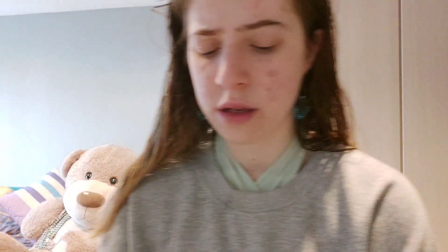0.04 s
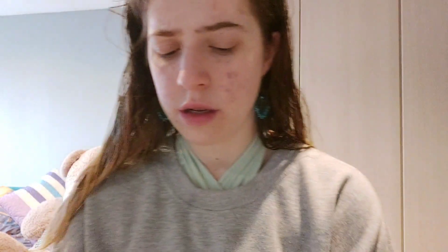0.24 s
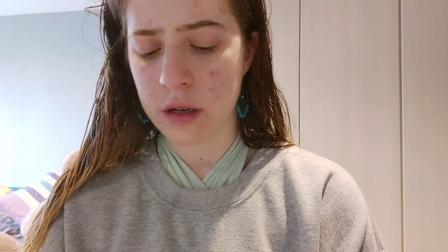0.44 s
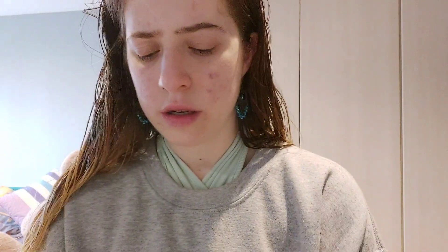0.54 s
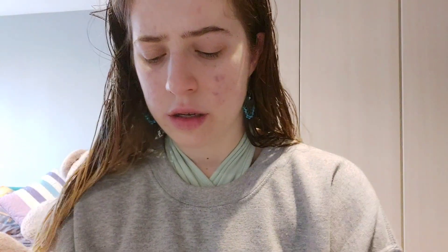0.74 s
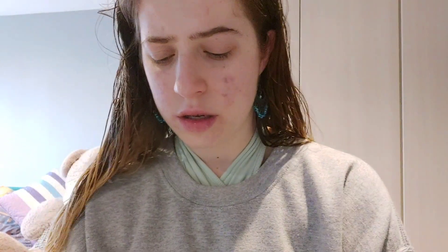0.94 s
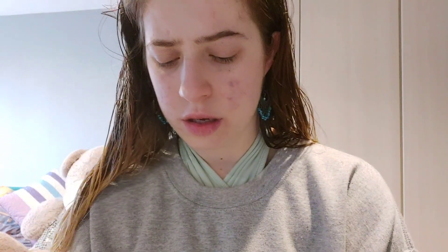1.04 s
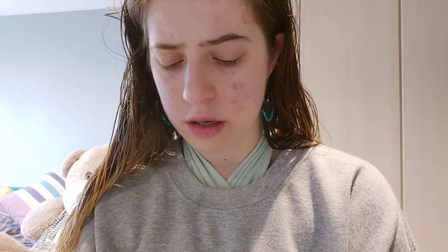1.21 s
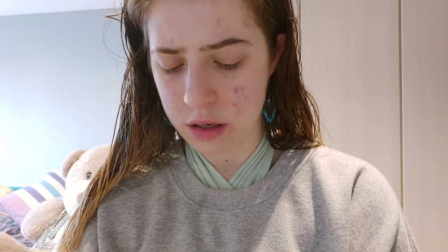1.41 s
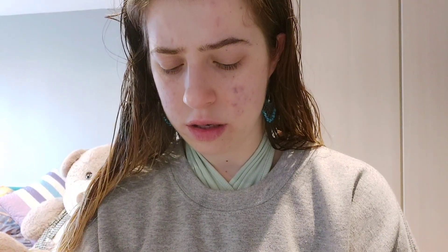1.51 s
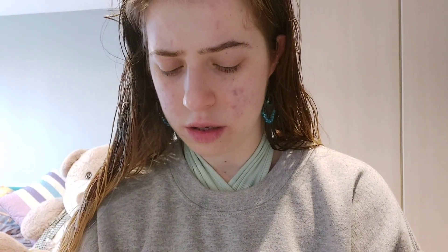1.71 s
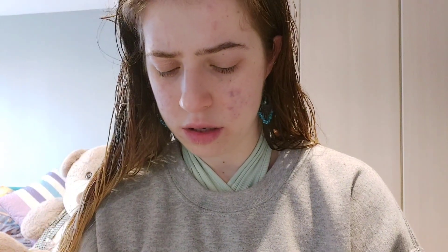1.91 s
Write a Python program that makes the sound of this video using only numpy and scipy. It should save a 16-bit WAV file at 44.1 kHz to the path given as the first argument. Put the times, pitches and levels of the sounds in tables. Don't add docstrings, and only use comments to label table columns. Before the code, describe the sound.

Jewellery is picked through in a small wooden box, left of a nearby microphone in a quiet bedroom. A tick and knock open, softer contacts follow, a rattle at 0.23 s, then the loudest clack and thump at 0.4 s. Faint rubbing and small clicks continue, clearer near 0.98 s. After near stillness, a crisp double knock lands at 1.52 s; faint stirring ends from 1.76 s.

```python
import sys
import numpy as np
from scipy import signal
from scipy.fft import rfft, irfft, next_fast_len
from scipy.io import wavfile
from scipy.ndimage import uniform_filter1d

SR = 44100
rng = np.random.default_rng(int(sys.argv[2]) if len(sys.argv) > 2 else 0)


def output_pcm(signal):
    pcm = np.clip(np.atleast_2d(signal).T, -1, 1) * 32767
    wavfile.write(sys.argv[1], SR, np.round(pcm).astype(np.int16))


def ratio(d):
    e = np.asarray(d, float) / 20
    return 10 ** e


N = 85995
LEAD_S = 0.004
BLOW_LEN = SR // 4


def unit(x):
    return x / np.sqrt(np.mean(x ** 2) + 1e-20)


def along(points, hz):
    f, v = np.transpose(points)
    return np.interp(np.log(hz + 1), np.log(f + 1), v)


def filtered(x, response):
    n = x.shape[-1]
    m = next_fast_len(n + 4096)
    return irfft(rfft(x, m) * response(np.fft.rfftfreq(m, 1 / SR)), m)[..., :n]


def ring(modes, t, attack_s):
    hz, db, t60 = np.transpose(modes)[:, :, None]
    level_luck, pitch_luck = rng.standard_normal((2, len(modes), 1))
    decay = ratio(db + 2.73 * level_luck - 60 * t / t60)
    tone = np.sin(2 * np.pi * hz * (1 + 0.016 * pitch_luck) * t)
    return (decay * tone).sum(0) * (1 - np.exp(-t / attack_s))


def blurred(x, width_hz):
    return np.abs(uniform_filter1d(np.abs(rfft(x)) ** 2, int(width_hz / 4) + 1))


def pulse(power, at_s):
    x = np.roll(irfft(np.sqrt(power), BLOW_LEN), round(at_s * SR))
    return x * (np.arange(len(x)) < 2 * at_s * SR)


# ratio to the knock pitch, level in dB, T60 in seconds.
WALL_MODES = [(1, 0, .024), (.78, -5, .016), (1.25, -7, .014), (1.65, -11, .014), (2.2, -16, .012)]
# frequency in Hz, level in dB.
TICK_COLOUR = [(600, -30), (1500, 0), (2500, 0), (5000, -3), (8000, -6), (11000, -4), (14000, -7),
               (16000, -10)]


def tap(knock_db, pitch_hz, tick_db, rattle_s):
    t = np.arange(BLOW_LEN) / SR
    after = np.maximum(t - LEAD_S, 0)
    spark = np.exp(-rattle_s / 0.003)

    rise_s = 0.00073 + 0.0023 * spark
    scrape = np.exp(np.minimum(t - LEAD_S, 0) / rise_s)
    rattle_fade_db = -8.5 * after / 0.0069
    tail_fade_db = -60 * np.maximum(after - rattle_s, 0) / 0.018
    edge = scrape * ratio(rattle_fade_db + tail_fade_db)

    def colour(hz):
        spark_db = 16.5 * spark * np.exp(-((hz - 13450) / 3640) ** 2)
        return ratio(along(TICK_COLOUR, hz) + spark_db)

    metal = unit(filtered(rng.standard_normal(len(t)), colour))
    tick = ratio(tick_db + 6.5) * edge * metal
    knock = ratio(7) * ring(np.multiply(WALL_MODES, [pitch_hz, 1, 1]), after, attack_s=0.00025)

    wood_power = blurred(ratio(-6) * knock, width_hz=900)
    metal_power = np.sum(tick ** 2) * unit(colour(np.fft.rfftfreq(len(t), 1 / SR))) ** 2
    wet_db = 0.1947 * (knock_db + 35.5)
    sent = ratio(knock_db + wet_db) * pulse(wood_power + metal_power, at_s=0.008)
    return ratio(knock_db) * (knock + tick), sent


# frequency in Hz, level in dB, T60 in seconds.
BOX_MODES = [(350, 0, .17), (497, -4, .13), (440, -7, .07), (570, -9, .08)]
# frequency in Hz, level in dB, T60 in seconds.
TABLE_MODES = [(127.5, -6, 0.15), (155.8, 3.5, 0.075), (214.3, -10.5, 0.082), (248, 5, 0.06)]
# frequency in Hz, level in dB, T60 in seconds.
FLOOR_MODES = [(65.8, 2.5, 0.23), (53.1, -6.5, 0.22)]


def thud(box_db, thump_db, boom_db):
    after = np.maximum(np.arange(BLOW_LEN) / SR - LEAD_S, 0)
    box = ratio(3.5) * ring(BOX_MODES, after, attack_s=0.002)
    table = ratio(thump_db + 5) * ring(TABLE_MODES, after, attack_s=0.0059)
    floor = ratio(boom_db) * ring(FLOOR_MODES, after, attack_s=0.0055)
    direct = ratio(box_db) * (box + table + floor)
    return direct, ratio(-4.5) * pulse(blurred(direct, width_hz=90), at_s=0.014)


# frequency in Hz, left-right likeness from 0 to 1.
LIKENESS = [(60, .97), (170, 0.68), (320, 0.84), (640, 0.52), (1400, 0.055), (16000, 0)]


def paired(pair):
    def mid_side(hz):
        turn = np.arccos(np.clip(along(LIKENESS, hz), -1, 1)) / 2
        return np.array([np.cos(turn), np.sin(turn)])

    mid, side = filtered(pair, mid_side)
    return np.array([mid + side, mid - side])


# frequency in Hz, T60 in seconds.
ROOM_T60 = [(100, 0.36), (500, 0.35), (2000, 0.31), (8000, 0.32), (16000, 0.23)]
# frequency in Hz, tail energy over direct in dB.
ROOM_LEVEL = [(100, -2.5), (500, -0.5), (2000, 6.5), (8000, 1.5), (12000, 1.5), (16000, -4)]


def room_tail():
    build_s, hold_s = 0.0027, 0.037
    hz, t, z = signal.stft(rng.standard_normal((2, SR // 2)), SR, nperseg=128)
    fade_db = -60 * np.maximum(t - hold_s, 0) / along(ROOM_T60, hz)[:, None]
    shape = (1 - np.exp(-t / build_s)) * ratio(fade_db)
    shape = shape / np.linalg.norm(shape, axis=1, keepdims=True)
    shape = shape * ratio(along(ROOM_LEVEL, hz))[:, None]
    noise = signal.istft(z * shape, SR, nperseg=128)[1][:, :SR // 2]
    return paired(noise) / 8


def from_left(hz):
    pan_db = np.array([[0.5], [-0.5]]) * 8.5 * hz / (hz + 407)
    delay_s = np.array([[0], [0.00015]])
    return ratio(pan_db) * np.exp(-2j * np.pi * hz * delay_s)


# start in seconds, knock level in dB, knock pitch in Hz,
# tick over knock in dB, rattle length in seconds.
TAP_EVENTS = [(-.02, -26.5, 846, -14.5, 0.0056), (.1145, -33, 1036, -38, 0.0035),
              (0.16, -69, 1070, -34, 0.0092), (0.2263, -40, 710, -19.5, 0.0065),
              (0.2341, -26, 1114, -20.5, 0.023), (0.347, -41.5, 1007, -16, 0.018),
              (0.394, -39, 1060, -12, 0.0057), (0.4018, -19, 905, -10, 0.003),
              (0.6973, -49, 1080, -33.5, 0.0055), (.7895, -48, 966, -4, 0.013),
              (0.846, -58, 1030, -16, .015), (0.915, -55.5, 900, -8, 0.018), (0.957, -55, 1040, 1.5, 0.016),
              (.975, -35, 1026, -12.5, 0.0049), (1.012, -48, 1030, -38, 0.0067),
              (1.178, -46.5, 885, -13.5, 0.011), (1.5161, -21, 1050, -4.5, 0.0019),
              (1.545, -24, 976, -16, 0.0083), (1.758, -45.5, 2000, -17.5, 0.0076),
              (1.874, -59, 900, -21, 0.0066), (1.901, -50, 900, -6, 0.016)]
# start in seconds, box ring in dB, table thump over it in dB,
# floor boom over it in dB.
THUD_EVENTS = [(-.02, -32.5, -3.5, -8), (0.044, -35, -8, -30), (0.115, -40, -36, -20),
               (0.132, -35.5, -7, -10), (0.179, -44.5, 5.5, -11), (0.23, -34.5, 5.5, -11),
               (0.243, -42.5, 2.5, 4), (0.344, -38.5, -9.5, -23), (.402, -20.5, 1.5, -3),
               (.47, -38.5, 4.5, -7.5), (.53, -56.5, -1, 0), (0.601, -55, -19, -21),
               (.655, -53.5, -25.5, -3), (0.696, -49, -32, -23), (.86, -45, -11, -3.5),
               (0.973, -40.5, -5, -20), (0.994, -47, -2, 8.5), (1.058, -51, -26.5, -8),
               (1.136, -58, 7.5, 10), (1.178, -52, 3.5, 8), (1.2, -55, 3.5, 9.5), (1.23, -61.5, 5, 7),
               (1.517, -25.5, -14, -14), (1.541, -28.5, -7, -2.5), (1.768, -48, -2, -10),
               (1.9, -52.5, 7, -8), (1.919, -54, -1, 13.5)]


def jewellery():
    margin = SR // 2
    out = np.zeros((2, N + 2 * SR))
    for source, events in ((tap, TAP_EVENTS), (thud, THUD_EVENTS)):
        for start_s, *settings in events:
            direct, sent = source(*settings)
            heard = signal.fftconvolve(sent[None], room_tail(), axes=1)
            heard[:, :len(direct)] += filtered(direct, from_left)
            first = round((start_s - LEAD_S) * SR) + margin
            out[:, first:][:, :heard.shape[1]] += heard
    return out[:, margin:][:, :N]


def hiss(spectrum):
    noise = rng.standard_normal((2, N))
    return unit(paired(filtered(noise, lambda hz: ratio(along(spectrum, hz)))))


# time in seconds, effort in dB.
SHUFFLE_EFFORT = [
    (0.0, -33),
    (0.384, -45.5),
    (0.564, -48),
    (0.646, -47),
    (1.064, -40.5),
    (1.292, -96.5),
    (1.558, -91),
    (1.688, -74),
    (1.764, -40),
    (1.95, -62.5),
]
# frequency in Hz, level in dB.
RUB_COLOUR = [(24, -64), (40, -48), (269, 6.5), (345, -17.5), (516, -7), (965, -1), (1440, -9),
              (1810, -9.5), (16000, -30.5)]


def fingers():
    s, effort_db = np.transpose(SHUFFLE_EFFORT)
    level_db = np.interp(np.arange(N) / SR, s, effort_db) - 13
    return ratio(level_db) * hiss(RUB_COLOUR)


# frequency in Hz, level in dB.
AIR_COLOUR = [(18, -54), (30, 4), (64, -5.5), (189, -26), (345, -18.5), (384, -14.5), (569, -12),
              (2980, -35), (16000, -37.5)]


def room_air():
    return ratio(-66.5) * hiss(AIR_COLOUR)


def scene():
    return jewellery() + fingers() + room_air()


def roll_off(x):
    return signal.sosfilt(signal.butter(12, 17110, fs=SR, output="sos"), x)


def record(dry):
    def edges(hz):
        low_cut_hz = 38
        bass_cut = (1j * hz / (low_cut_hz + 1j * hz)) ** 2 * hz ** 2 / (hz ** 2 + low_cut_hz ** 2)
        top_cut_db = -27 * (1 + np.tanh((hz - 15900) / 60)) / 2
        return bass_cut * ratio(top_cut_db)

    return roll_off(filtered(dry, edges))


dry = scene()
out = record(dry)
output_pcm(out)
```